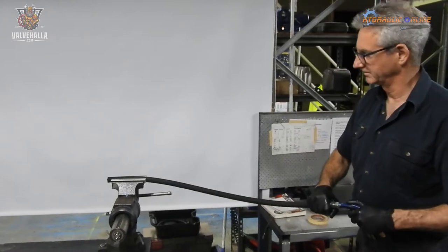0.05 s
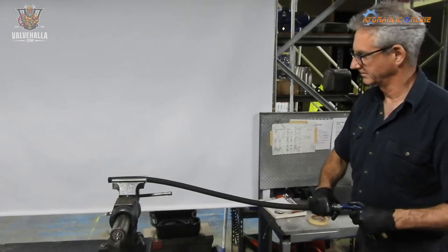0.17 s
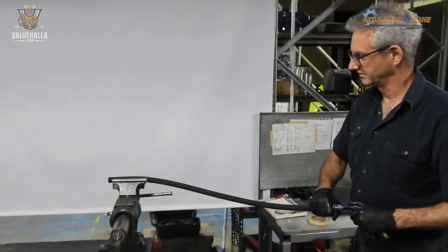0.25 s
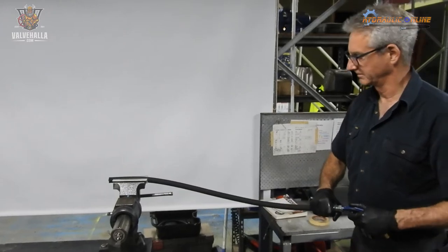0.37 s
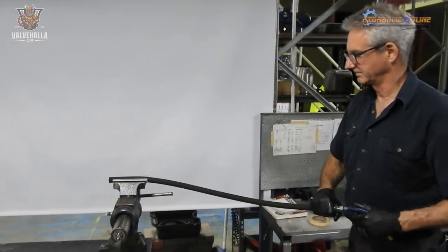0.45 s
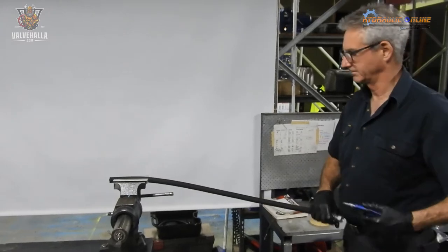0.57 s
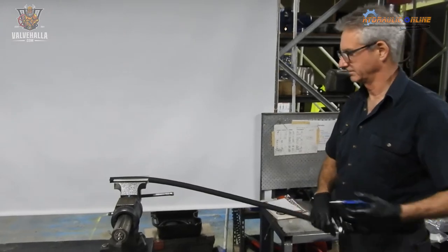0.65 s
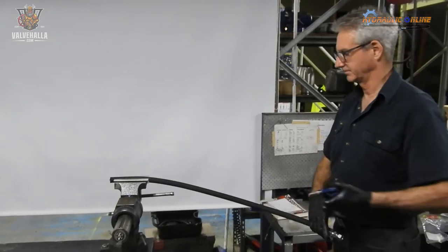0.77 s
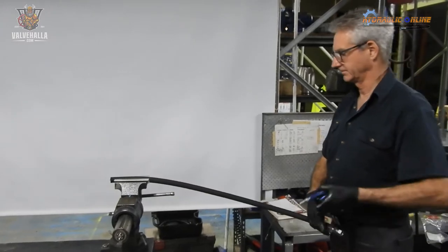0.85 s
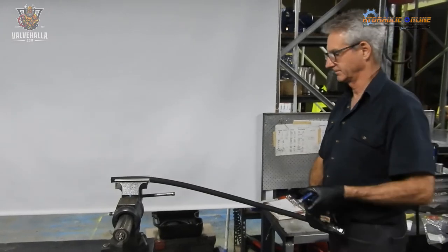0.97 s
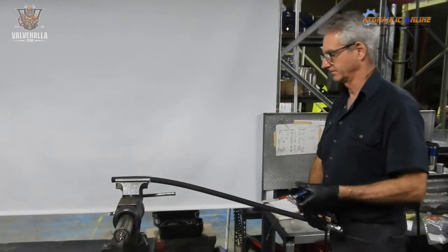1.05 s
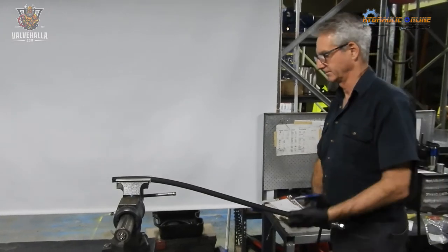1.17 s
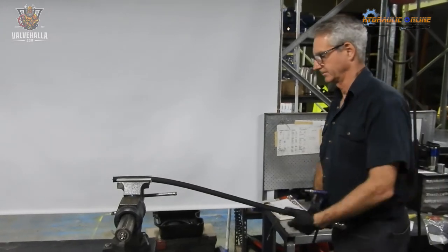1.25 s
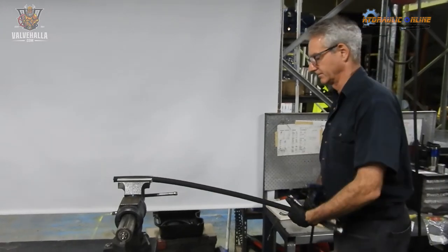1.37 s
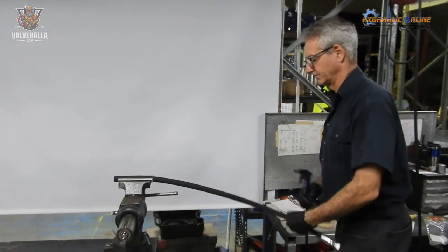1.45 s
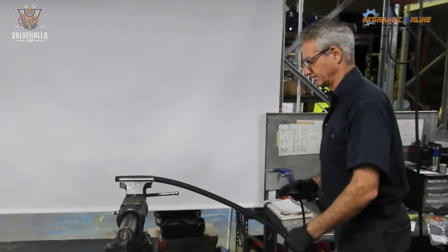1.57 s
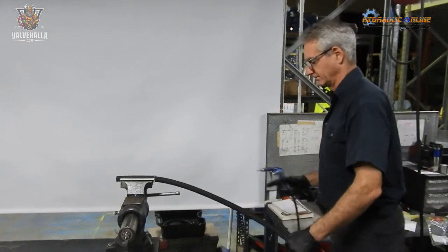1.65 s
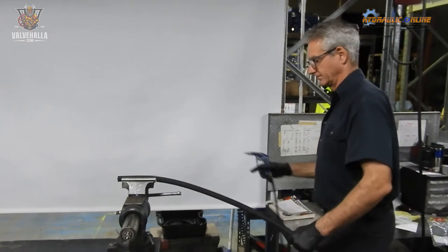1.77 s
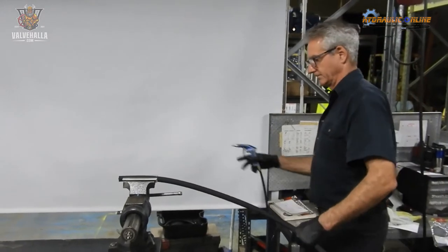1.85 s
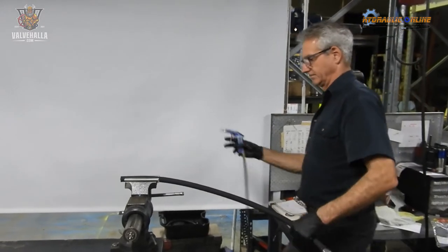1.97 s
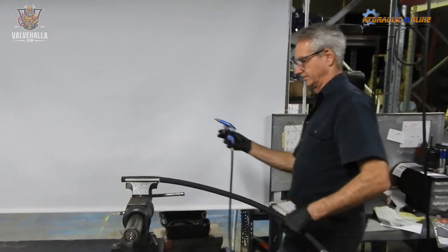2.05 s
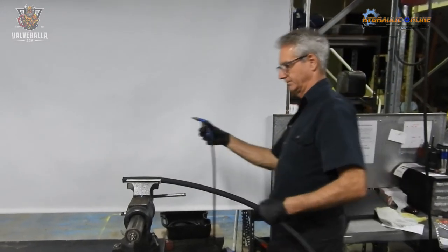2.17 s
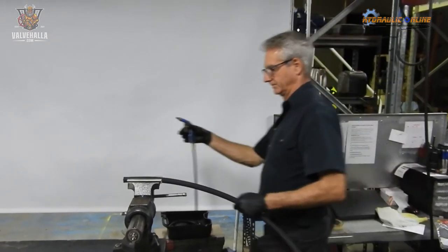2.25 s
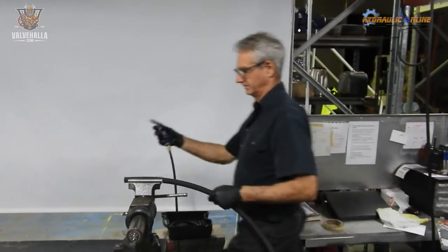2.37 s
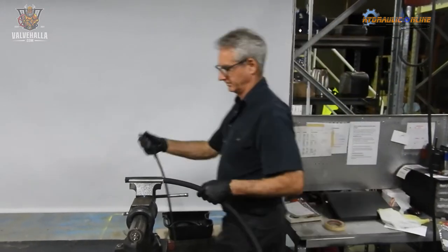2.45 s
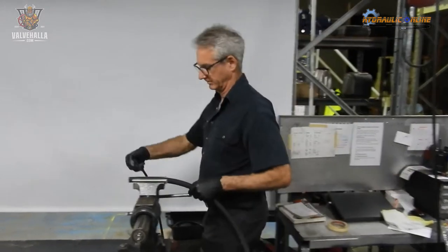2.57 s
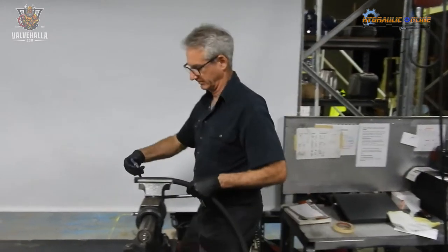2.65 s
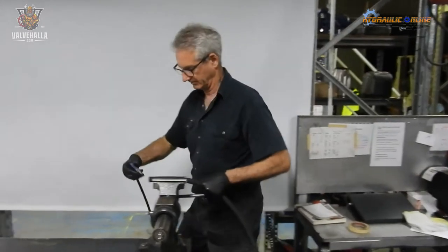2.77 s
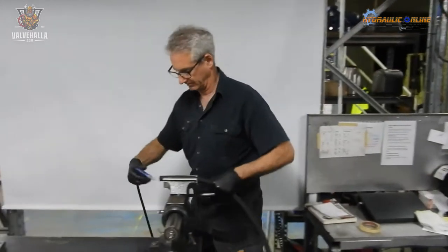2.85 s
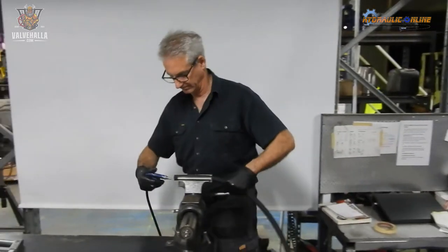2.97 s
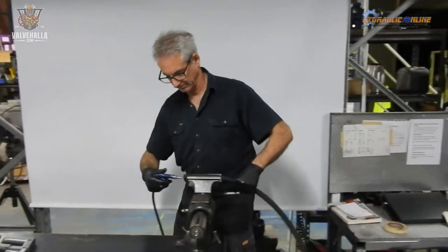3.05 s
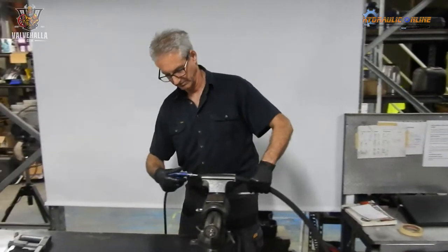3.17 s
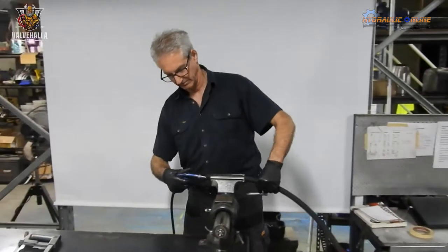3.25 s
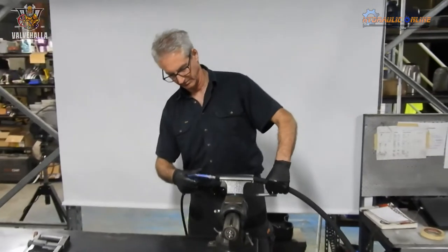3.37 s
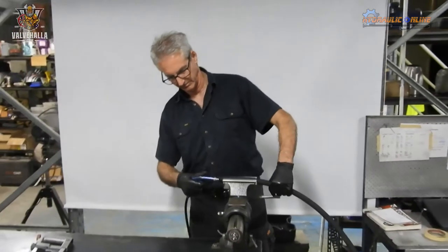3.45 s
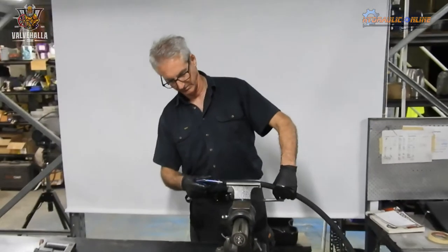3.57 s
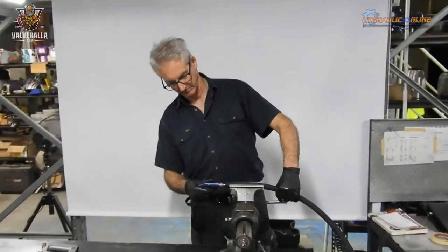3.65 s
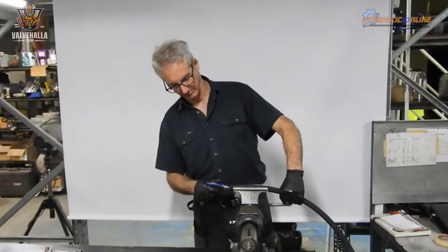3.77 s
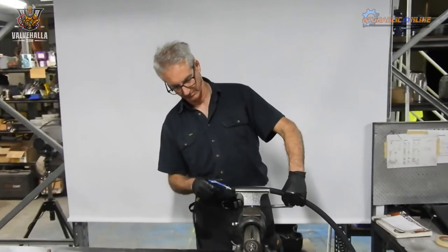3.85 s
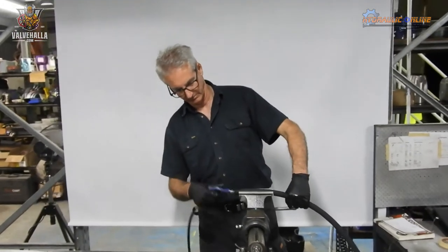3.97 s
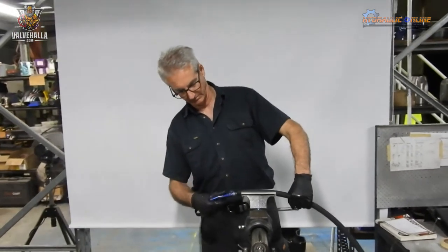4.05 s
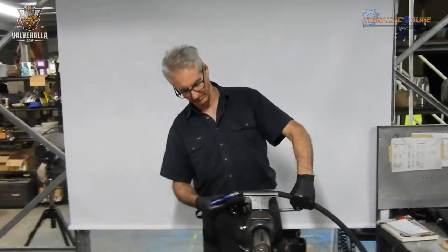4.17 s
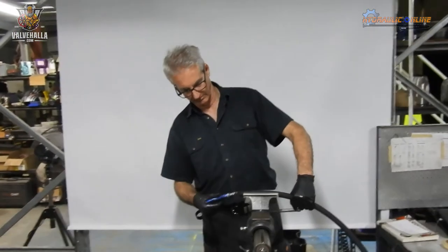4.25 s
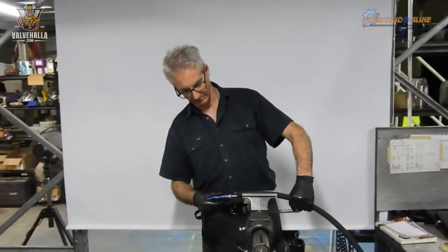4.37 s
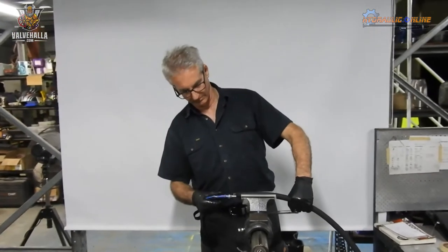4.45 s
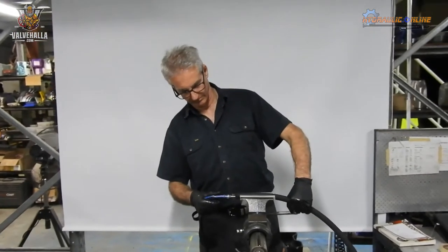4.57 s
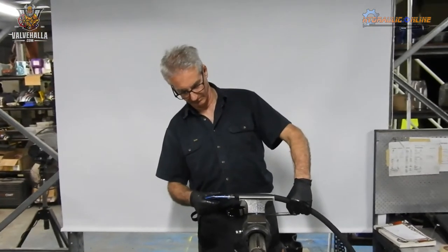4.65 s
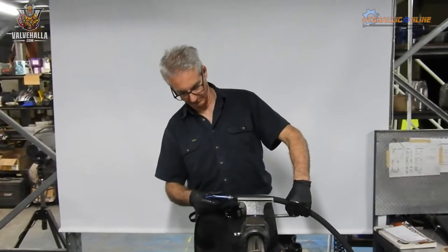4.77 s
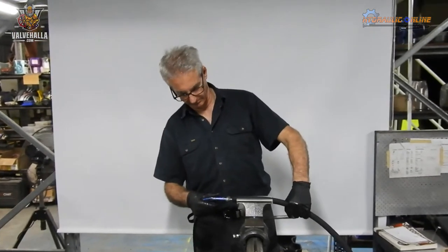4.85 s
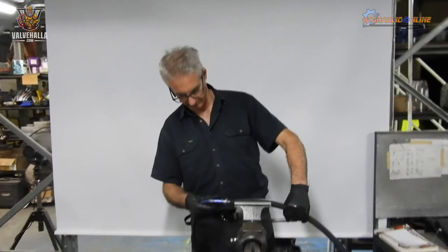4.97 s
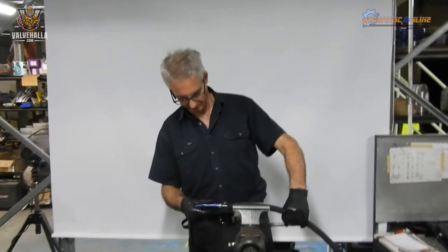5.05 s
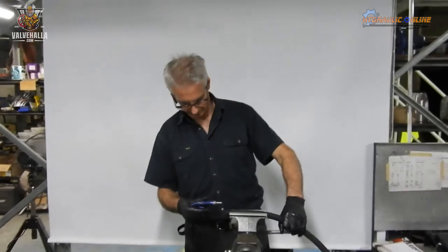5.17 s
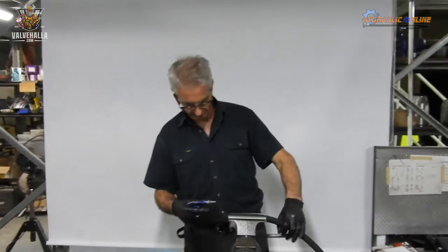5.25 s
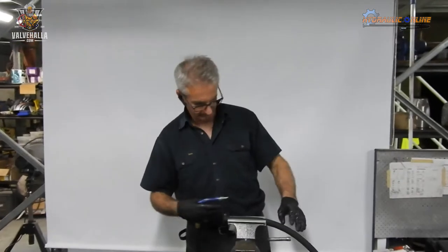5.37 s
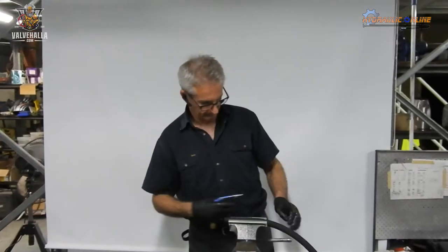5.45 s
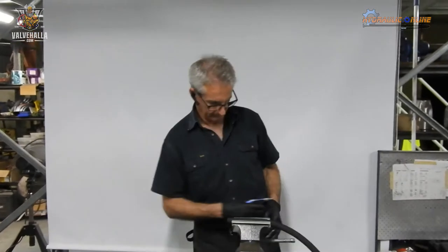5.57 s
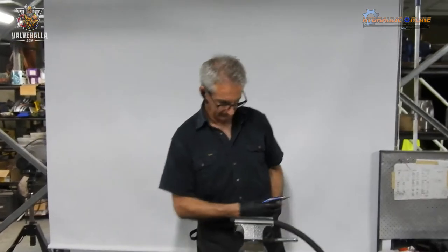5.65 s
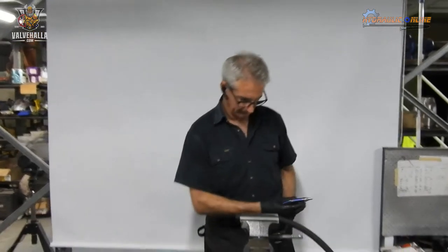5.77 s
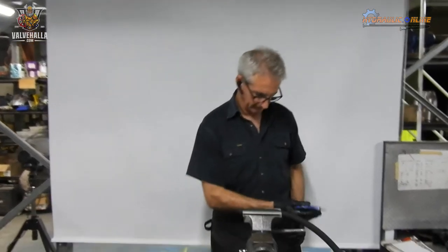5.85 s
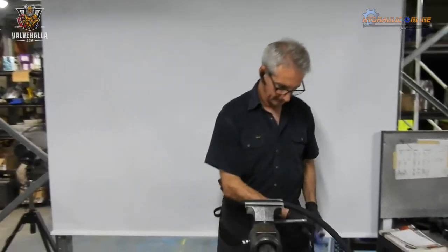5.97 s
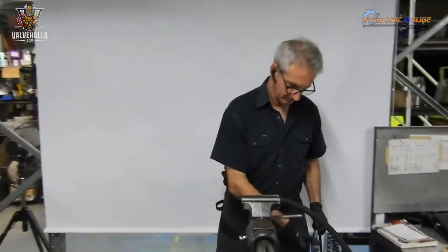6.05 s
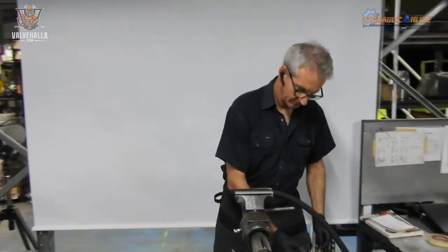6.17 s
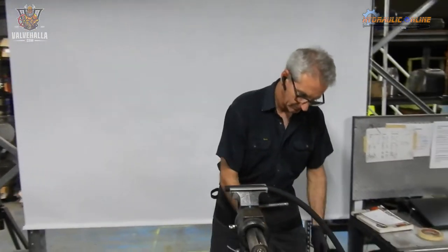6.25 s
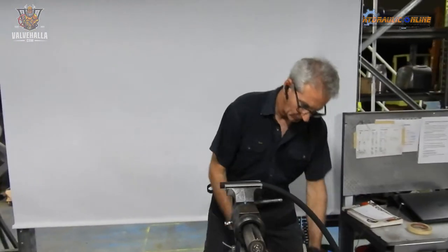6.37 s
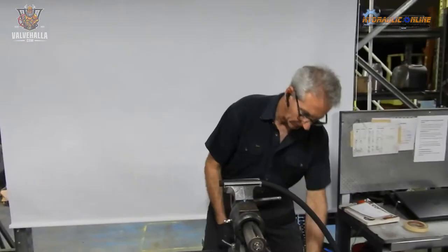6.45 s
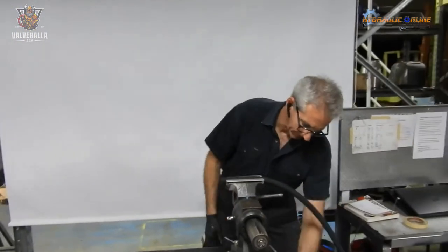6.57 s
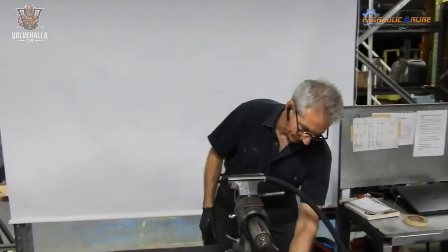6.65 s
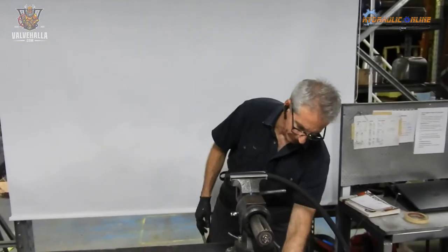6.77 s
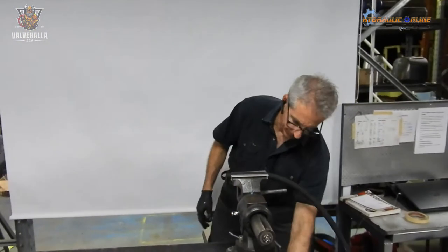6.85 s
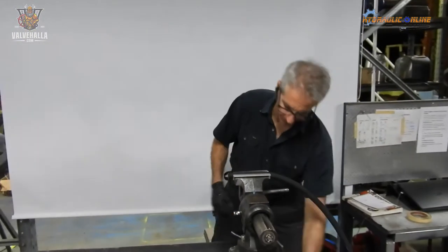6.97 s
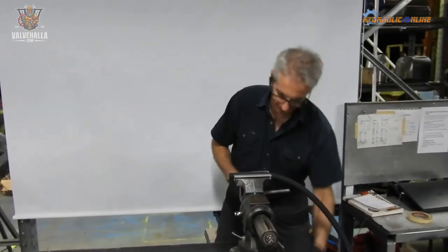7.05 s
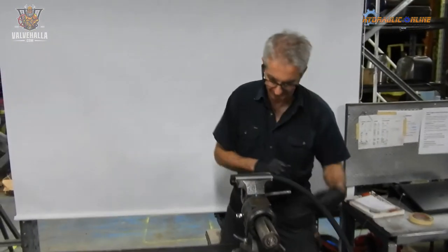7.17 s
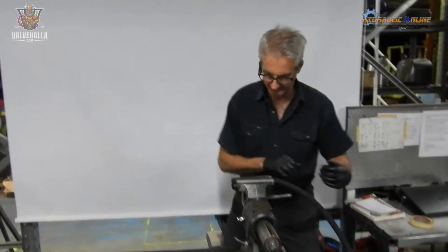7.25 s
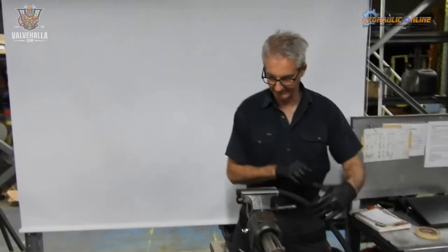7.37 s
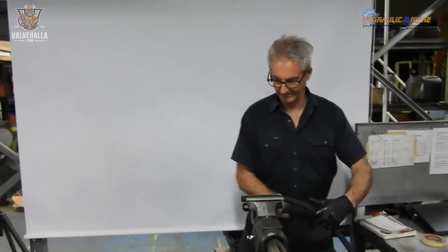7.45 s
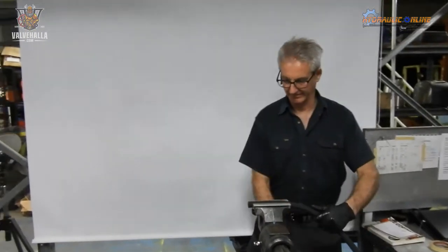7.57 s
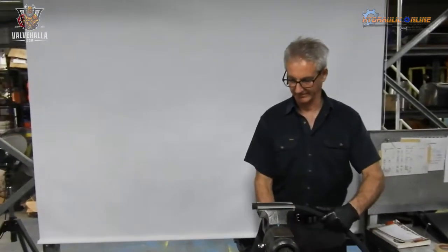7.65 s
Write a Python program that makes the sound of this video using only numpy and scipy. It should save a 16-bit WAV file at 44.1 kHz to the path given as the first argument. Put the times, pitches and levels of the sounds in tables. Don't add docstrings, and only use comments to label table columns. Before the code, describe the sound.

A fierce compressed-air blast cuts off, faint leaks, rubs and clicks follow, then a second roaring blast through the hose and a tool knocked down.

```python
import sys
import numpy as np
from scipy import signal
from scipy.fft import rfft, irfft, next_fast_len
from scipy.io import wavfile
from scipy.ndimage import uniform_filter1d

SR = 44100
rng = np.random.default_rng(int(sys.argv[2]) if len(sys.argv) > 2 else 0)


def inscribe(sig):
    pcm = np.round(np.clip(np.atleast_2d(sig).T, -1, 1) * 32767)
    wavfile.write(sys.argv[1], SR, pcm.astype(np.int16))


def makeup_ratio(level_db):
    decades = np.asarray(level_db, float) / 20
    return 10 ** decades


N = 340452
t = np.arange(N) / SR

# opens/s, shuts/s, hiss level/dB, easing before shut/s, bleed after shut/dB
BLASTS = [
    (-0.5, 0.559, -16.5, 0.052, -22),
    (3.15, 5.347, -21.5, .1, -9),
]
HOSE_HZ = [175.7, 174.1]
JET_EDGES_HZ = (550, 1450, 3900, 6500)
# f/Hz, density/dB
JETS = [
    [(88, -81), (150, -37), (699, -29), (800, -23.5), (1110, -31), (1200, -19), (1270, -26.5),
     (1370, -17.5), (2800, -17), (3080, -12.5), (4030, -12.5), (4890, -8), (6400, -5), (9050, 4.5),
     (14900, -36.5)],
    [(88, -62), (150, -20), (588, -24.5), (864, -17.5), (952, -23), (1030, -16.5), (1110, -22),
     (1200, -15.5), (1290, -18.5), (1940, -14.5), (2800, -16), (5480, -6.5), (7610, -6.5), (9400, 1),
     (14900, -39)],
]
# f/Hz, width/Hz, level/dB
RIM = [
    [(4960, 500, 2.5), (5400, 650, -6.5)],
    [(4310, 220, -1), (5200, 700, -5)],
]
# rim/dB, upper hose/dB, lower hose/dB, buffet/dB
SHARES = [
    (-6.5, -12, -23, -46),
    (-3.5, -11, -21.5, -36.5),
]
# t/s, half length/s, flow/dB, escape beside rim/dB, hose hum/dB
SHIFTS = [(0.0, 0.039, -0.5, 2.5, 7), (0.15, 0.094, 1.5, -1, 3.5), (0.27, 0.047, 0, -0.5, -3),
          (0.392, 0.2, -2, 1.5, -4.5), (0.5, 0.015, -2, 0.5, -2.5), (3.291, 0.078, 0.5, 8.5, 2.5),
          (3.35, 0.12, -1, -2, -13), (3.65, 0.23, 3, -1.5, -2), (3.752, 0.17, 0.5, 2, 3.5),
          (4.01, 0.21, -1.5, 1, -5), (4.106, 0.054, 0, -0.5, -4), (4.28, 0.21, 2, 2, 3.5),
          (4.332, 0.037, -5, 1.5, -4), (4.371, 0.029, -8.5, 9, -2), (4.438, .085, 2.5, 6, -3.5),
          (4.552, 0.091, -5, 2, 1.5), (4.648, 0.041, -16.5, -2.5, 1), (4.85, 0.16, 2, -1.5, -3),
          (5.02, 0.18, 1, -0.5, 4), (5.23, 0.059, -1.5, 4.5, 5.5), (5.332, .12, -6.5, 8.5, 4.5)]
# t/s, half length/s, buffet lift/dB, rumble lift/dB
GUSTS = [(0.13, .1, 2.5, 5), (3.2, .1, 9.5, 2.5), (3.32, .08, -13, -8), (3.8, .2, -2.5, 5),
         (4.0, .1, -10, 2), (4.23, .1, 5, -1), (4.38, .1, -2.5, 17.5), (4.48, .06, 9.5, -16),
         (4.68, .1, -0.5, 8), (5.13, .2, 10.5, -4), (5.29, .08, 21, 13)]
SURGE_RISE_S, SURGE_S = .011, 0.066
SURGE_DB = (15, 9, 17.1, 21, 22.8)
HOSE_HOLDS_DB = 2
ESCAPE_ROBS, ESCAPE_PAN, PAN_DB = .2, .2, 1.2


def blasts():
    out = np.zeros((2, N))
    flow, escape, hum = sum(np.outer(db, tent(s, half_s)) for s, half_s, *db in SHIFTS)
    gust = sum(db * tent(s, half_s) for s, half_s, db, _ in GUSTS)
    for blast, shares, hz, colour, edge in zip(BLASTS, SHARES, HOSE_HZ, JETS, RIM):
        opens, shuts, db, ease_s, bleed_db = blast
        rise = np.clip((t - opens) / SURGE_RISE_S + .75, 0, 1)
        surge = rise * np.exp(-np.abs(t - opens) / SURGE_S)
        held = HOSE_HOLDS_DB * np.interp(t, [shuts - ease_s, shuts], [0, 1])
        lost = held - ESCAPE_ROBS * escape
        moves = [escape, lost, 0.53 * lost + 0.067 * hum, 0.91 * lost + hum, gust]
        levels = [a + b * surge + c for a, b, c in zip((0, *shares), SURGE_DB, moves)]
        hiss_db, rim_db, upper_db, lower_db, buffet_db = levels
        level_db = db + flow + trigger(opens, shuts, ease_s, bleed_db)
        pan_db = PAN_DB + ESCAPE_PAN * escape + 1.2 * walk(8.9)

        buffet, lower, upper, rim, hiss = zones(colour, JET_EDGES_HZ, steep=9.5)
        rim = rim + sum(makeup_ratio(g + walk(8)) * band(rim, f, w) for f, w, g in edge)
        rim_air = hose(rim, hz, back=0.12, dull=0.084)
        upper_air = hose(upper, hz, back=0.4, dull=.2)
        lower_air = hose(lower, hz, back=0.45, dull=.2)

        jet = wide(hiss, share=0.43) * makeup_ratio(hiss_db + 0.22 * walk(40))
        jet = jet + wide(rim_air, share=.3) * makeup_ratio(rim_db + .8 * walk(30))
        jet = jet + upper_air * makeup_ratio(upper_db + 1.2 * walk(18))
        jet = jet + lower_air * makeup_ratio(lower_db + 1.8 * walk(20))
        eddies_db = 0.81 * walk(30) + 0.63 * walk(250)
        out += jet * makeup_ratio(level_db + eddies_db - 3.0 + np.array([pan_db, -pan_db]) * 0.33)
        out += buffet * makeup_ratio(level_db - flow + buffet_db + 2.2 * walk(25) - 3.0)
    return out


CRACK_S, CRACK_DB, CRACK_LAST_DB = .027, -15, -2.5
EASE_DB, BLEED_DB_PER_S = -7.5, 111.5


def trigger(opens, shuts, ease_s, bleed_db):
    snap, end = .004, shuts + 0.19
    opening_s = [opens - CRACK_S - snap, opens - CRACK_S, opens - snap, opens]
    closing_s = [shuts - ease_s, shuts, shuts + 2 * snap, end, end + snap]
    last_db = EASE_DB + bleed_db
    opening_db = [-90, CRACK_DB, CRACK_LAST_DB, 0]
    closing_db = [0, EASE_DB, last_db, last_db - BLEED_DB_PER_S * .12, -90]
    return np.interp(t, opening_s + closing_s, opening_db + closing_db)


def hose(x, hz, back, dull):
    size = next_fast_len(N)
    step = np.exp(-2j * np.pi * np.arange(size // 2 + 1) / size)
    loop = back * (1 - dull) / (1 - dull * step) * step ** (SR / hz)
    return unit(irfft(rfft(x, size) / (1 - loop), size)[:N])


# f/Hz, density/dB
RUSTLE = [(150, -19), (250, -1.5), (496, -14.5), (549, -3.5), (698, -12.5), (857, -5.5), (1150, -8.5),
          (2890, -8), (3610, -5), (4000, -6.5), (8930, 5), (9560, 5.5), (14900, -34)]
RUSTLE_EDGES_HZ = (1600, 4000)
# t/s, rise/s and fall/s per 15 dB, level/dB
LEAKS = [(0.9, 0.11, 0.043, -58), (1.062, 0.017, 0.091, -59), (1.15, .01, 0.29, -55),
         (1.381, 0.023, 0.08, -50), (1.527, 0.13, 0.19, -50.5), (1.653, 0.096, 0.065, -47.5),
         (2.0, .1, .2, -58), (2.125, 0.17, 0.089, -58.5), (2.19, .03, 0.47, -40.5), (2.375, 0.35, .3, -38),
         (2.481, 0.3, 0.44, -37), (2.707, .2, 0.23, -43), (2.8, .3, 0.11, -44.5), (2.959, .004, 0.2, -41.5),
         (5.65, .2, 0.22, -57.5), (5.8, .03, 0.33, -58.5), (5.93, 0.086, 0.074, -55),
         (6.024, .04, 0.088, -53.5), (6.2, 0.079, 0.11, -61.5), (6.47, .12, 0.98, -55.5),
         (6.855, 0.13, 0.24, -51.5), (7.068, 0.074, .35, -48), (7.386, .6, 0.14, -51),
         (7.532, .025, 0.033, -40), (7.572, .017, .03, -41.5), (7.59, .012, 0.13, -36.5),
         (7.633, 0.076, .015, -36), (7.64, .01, 0.21, -41)]
# t/s, half length/s, lift/dB
WHISTLES = [
    (1.19, .08, 22),
    (1.56, .12, 22),
    (7.662, .16, 32.5),
]
# t/s, rise/s and fall/s per 15 dB, cloth/dB, drag re cloth/dB
RUBS = [(1.221, .1, .3, -59, 0), (1.365, 0.3, 0.066, -52.5, -17), (2.15, 0.96, .4, -58, -7),
        (2.481, 0.18, 0.39, -51.5, 3), (2.707, 0.096, 0.2, -48, -1), (2.96, .005, 0.14, -38.5, -10),
        (5.65, 0.25, 0.27, -59, -20), (6.5, .1, 0.98, -57, 1.5), (7.2, 0.48, 0.8, -51.5, -8),
        (7.604, 0.023, 0.058, -37, -0.5)]
WHISTLE_DB = -3.5
QUIET_DB, QUIET_FOLLOWS = (-70.5, -70.5, -67), (0.47, 0.69, 0.96)
LEAK_CLOTH_DB, LEAK_DRAG_DB = -9.5, -19.5


def handling():
    drag, cloth, leak = zones(RUSTLE, RUSTLE_EDGES_HZ, steep=5.55)
    sing_db = sum(db * tent(s, half_s) for s, half_s, db in WHISTLES)
    leak = leak + makeup_ratio(WHISTLE_DB + 3 * walk(8) + sing_db) * band(leak, 13650, 120)

    creep = gain_db()
    quiet = [db + share * creep for db, share in zip(QUIET_DB, QUIET_FOLLOWS)]
    puff = loudest(LEAKS)
    cloth_rub = loudest([row[:4] for row in RUBS])
    drag_rub = loudest([(s, up, down, db + more) for s, up, down, db, more in RUBS])
    leak_db = np.maximum(puff, quiet[0])
    cloth_db = np.max([cloth_rub, puff + LEAK_CLOTH_DB, quiet[1]], axis=0)
    drag_db = np.max([drag_rub, puff + LEAK_DRAG_DB, quiet[2]], axis=0)

    mix = wide(leak, share=.6) * makeup_ratio(leak_db + .8 * walk(40))
    mix = mix + wide(cloth, share=.3) * makeup_ratio(cloth_db + 1.8 * walk(60))
    mix = mix + drag * makeup_ratio(drag_db + 1.8 * walk(40))
    return makeup_ratio(-3.5) * mix


# t/s, peak/dB, f/Hz, width/Hz, t60/s
SCUFFS = [(1.387, -43, 9100, 3000, 0.078), (2.627, -32, 1520, 1504, 0.012), (2.697, -38.5, 954, 494, 0.28),
          (2.75, -39, 199, 40, 0.14), (2.957, -39, 3020, 860, 0.21), (7.528, -44, 3500, 4040, .02),
          (7.569, -30, 4880, 1800, 0.029), (7.586, -31.5, 2510, 910, 0.35), (7.602, -32.5, 393, 120, 0.12),
          (7.627, -31, 193, 40.3, 0.11), (7.652, -32.5, 199.6, 40, .1), (7.679, -44, 190, 40, .15)]
# t/s, peak/dB, f/Hz, width/Hz, t60/s
KNOCKS = [
    (6.867, -26, 1150, 427, 0.089),
    (6.869, -35, 650, 300, 0.26),
    (6.872, -37.5, 250, 120, 0.13),
    (6.893, -38, 1300, 600, .08),
    (6.918, -40, 1140, 550, 0.11),
    (7.077, -20.5, 1030, 464, 0.088),
    (7.077, -26, 2500, 1500, 0.032),
    (7.08, -29, 620, 248, 0.19),
    (7.082, -30.5, 218, 121, 0.17),
    (7.084, -35, 1500, 800, 0.23),
]


def scuffs():
    out, length = np.zeros(N + SR), SR // 3
    for s, db, hz, width_hz, t60 in SCUFFS + KNOCKS:
        k = int(s * SR)
        sound = rng.standard_normal(length) * 1000. ** (-t[:length] / t60)
        sound[0] = 0.79 * np.sqrt(SR / width_hz)
        for _ in range(3):
            sound = band(sound, hz, 2 * width_hz)
        out[k:k + length] += makeup_ratio(db + 2.0) * sound / np.abs(sound).max()
    return out[:N]


# t/s, peak/dB, f/Hz, t60/s
TICKS = [
    (1.3773, -44, 9140, 0.011),
    (1.3803, -28.5, 9380, 0.0089),
    (2.1874, -30, 9790, 0.011),
]


def ticks():
    out, length = np.zeros(N + SR), 4000
    for s, db, hz, t60 in TICKS:
        k = int(s * SR)
        crack = rng.standard_normal(length) * 1000. ** (-t[:length] / (0.56 * t60))
        out[k:k + length] += makeup_ratio(db) * (ring(hz, t60, length) + 0.14 * crack)
    return out[:N]


def ring(hz, t60, length):
    return np.sin(2 * np.pi * hz * t[:length]) * 1000. ** (-t[:length] / t60)


# t/s, slip rate/Hz, level/dB
CREAK = [
    (1.18, 103, -56),
    (1.198, 95, -55),
    (1.234, 102, -59),
    (1.298, 110, -57.5),
    (1.33, 100, -76),
]
# f/Hz, width/Hz, level/dB
CREAK_BODY = [(980, 140, 0), (1460, 120, -3)]


def creak():
    gate, (rate, db) = played(CREAK, fade_s=.005)
    turns = np.cumsum(rate * (1 + .12 * walk(70))) / SR
    slips = np.diff(np.floor(turns), prepend=0) * makeup_ratio(2.0 * rng.standard_normal(N))
    wall = unit(sum(makeup_ratio(g) * band(band(slips, f, w), f, 3 * w) for f, w, g in CREAK_BODY))
    return gate * wall * makeup_ratio(db - 0.5)


# f/Hz, t60/s
ROOM_T60 = [(100, 0.65), (1000, 0.64), (4000, 0.89), (10000, 0.5)]
# f/Hz, likeness/0-1
ROOM_ALIKE = [(100, 0.6), (1000, 0.62), (4000, 0.5), (10000, .05)]
ROOM_DB, NEARBY_DB, NEARBY_T60_S = -5, -2.5, 0.05


def room():
    edges = 125 * 2. ** np.arange(7)
    flat = [(20, 0), (20000, 0)]
    mids, sides = (zones(flat, edges, steep=3.2, length=SR) for _ in range(2))
    tail, nearby = 0, 0
    for hz, mid, side in zip([*edges / 1.4, 11000], mids, sides):
        alike = np.clip(on_log(ROOM_ALIKE, hz), 0, 1)
        apart = side * np.array([[1], [-1]])
        octave = np.sqrt(hz) * (np.sqrt(1 + alike) * mid + np.sqrt(1 - alike) * apart)
        tail = tail + octave * 1000. ** (-t[:SR] / on_log(ROOM_T60, hz))
        nearby = nearby + (1 - alike) * octave * 1000. ** (-t[:SR] / NEARBY_T60_S)
    tail = tail * np.clip(t[:SR] / 0.0012 - 1, 0, 1)
    return (makeup_ratio(ROOM_DB) * unit(tail) + makeup_ratio(NEARBY_DB) * unit(nearby)) / np.sqrt(SR)


# f/Hz, density/dB
HALL = [(12, -57), (20, -18), (27, -22.5), (59, -6), (75, 4), (103, -5), (149, -0.5), (209, 2),
        (244, -10.5), (284, -10.5), (364, -9.5), (561, -10.5), (800, -14.5), (1040, -49), (1760, -120)]
RUMBLE_DB = -69.5


def rumble():
    db = RUMBLE_DB + gain_db() + sum(g * tent(s, half_s) for s, half_s, _, g in GUSTS)
    mid, side = (sum(zones(HALL, [], steep=1)) for _ in range(2))
    return (mid + .2 * side * np.array([[1], [-1]])) * makeup_ratio(db + 5.5 + walk(12))


GAIN_WAITS_S, GAIN_DB_PER_S, GAIN_RANGE_DB, GAIN_DROPS_S = 0.43, 9.5, 17, .17


def gain_db():
    lift = GAIN_RANGE_DB
    for opens, shuts, *_ in BLASTS:
        back = shuts + GAIN_WAITS_S
        times = [opens, opens + GAIN_DROPS_S, back, back + GAIN_RANGE_DB / GAIN_DB_PER_S]
        lift = np.minimum(lift, GAIN_RANGE_DB * np.interp(t, times, [1, 0, 0, 1]))
    return lift


def zones(spectrum, edges_hz, steep, length=N):
    size = next_fast_len(length)
    hz = np.arange(size // 2 + 1) * SR / size
    below = [0, *(1 / (1 + (hz / e) ** steep) for e in edges_hz), 1]
    shape = makeup_ratio(on_log(spectrum, hz))
    parts = [shape * np.sqrt(np.clip(b - a, 0, 1)) for a, b in zip(below, below[1:])]
    return [unit(irfft(p * rfft(rng.standard_normal(size)), size)[:length]) for p in parts]


def band(x, hz, width_hz):
    return signal.lfilter(*signal.iirpeak(hz, hz / width_hz, fs=SR), x)


def wide(x, share):
    return x + share * np.roll(x, N // 3) * np.array([[1], [-1]])


def walk(rate):
    k = int(SR / rate)
    held = np.repeat(rng.standard_normal(N // k + 1), k)
    return unit(uniform_filter1d(uniform_filter1d(held, k), k)[:N])


def tent(s, half_s):
    return np.interp(t, [s - half_s, s, s + half_s], [0, 1, 0])


def loudest(rows):
    return np.max([np.interp(t, [s - 4 * up, s, s + 4 * down], [db - 60, db, db - 60], -150, -150)
                   for s, up, down, db in rows], axis=0)


def played(table, fade_s):
    s, *columns = np.transpose(table)
    gate = np.interp(t, [s[0] - fade_s, s[0], s[-1], s[-1] + fade_s], [0, 1, 1, 0])
    return gate, [np.interp(t, s, c) for c in columns]


def on_log(table, hz):
    at, value = np.transpose(table)
    return np.interp(np.log(hz + 1), np.log(at + 1), value)


def unit(x):
    return x / np.sqrt(np.mean(x ** 2))


LEFT_DB = 1
SHIFT_TURNS_HZ = 1.2


def scene():
    small = handling() + ticks() + scuffs() + creak()
    near = blasts() + small * makeup_ratio(np.array([[LEFT_DB], [-LEFT_DB]]) / 2)
    mono = near.mean(axis=0, keepdims=True)
    turn = 2 * np.pi * SHIFT_TURNS_HZ * t
    echo = sum(signal.fftconvolve(room(), share * mono, axes=1) for share in (np.cos(turn), np.sin(turn)))
    return near + echo[:, :N] + rumble()


# f/Hz, share emptied/0-1, lift of the rest/dB
EMPTY = [(1500, 0.01, 0), (2800, .06, 0.2), (4470, 0.02, 0), (10800, 0.01, -0.5), (12600, .2, 3),
         (13700, 0.8, 13), (15000, 0.6, 9)]
TOO_FAINT_DB, FAINT_FROM_HZ = -101, 10000


def patchy(x):
    hz, s, spec = signal.stft(x, SR, nperseg=1024)
    chance = rng.random((2, len(hz) // 3 + 1, len(s) // 5 + 1))
    chance = np.repeat(np.repeat(chance, 3, axis=1), 5, axis=2)[:, :len(hz), :len(s)]
    treble = (hz > FAINT_FROM_HZ)[:, None]
    chance = np.where(treble, chance, chance[0])
    at, share, lift_db = np.transpose(EMPTY)
    kept = chance > np.interp(hz, at, share)[:, None]
    gain = kept * makeup_ratio(np.interp(hz, at, lift_db))[:, None]
    strength = uniform_filter1d(uniform_filter1d(np.abs(spec), size=5, axis=1), size=3, axis=2)
    gain = gain * (~treble | (strength > makeup_ratio(TOO_FAINT_DB)))
    return signal.istft(spec * gain, SR, nperseg=1024)[1][:, :N]


def top_cut(x):
    return signal.sosfilt(signal.butter(12, 15070, fs=SR, output="sos"), x)


SELF_NOISE_DB = -90


def record(dry):
    hiss = rng.standard_normal((2, N)) * makeup_ratio(SELF_NOISE_DB + gain_db())
    sides = dry * makeup_ratio(np.array([[.4], [-.4]])) + hiss
    mix = patchy(np.clip(sides, -1, 1))
    return top_cut(mix)


dry = scene()
out = record(dry)
inscribe(out)
```